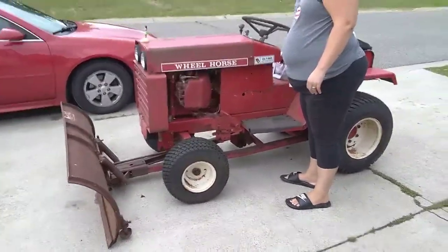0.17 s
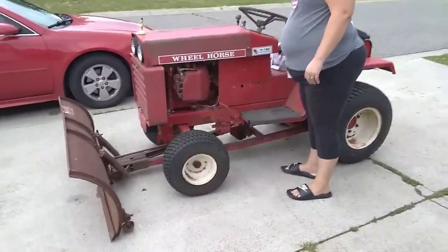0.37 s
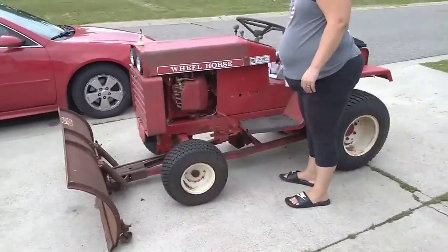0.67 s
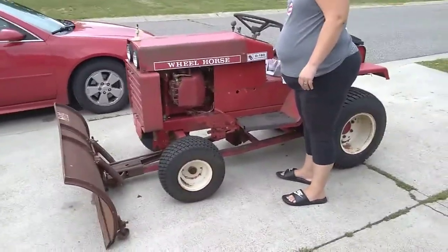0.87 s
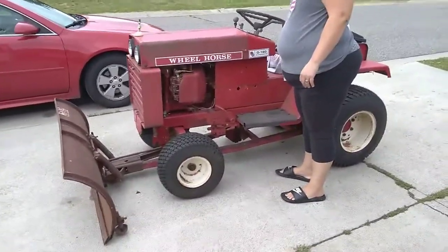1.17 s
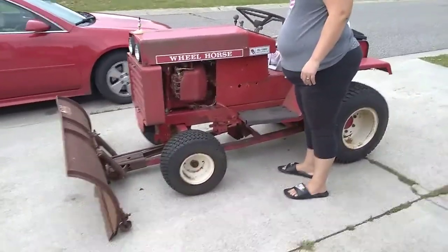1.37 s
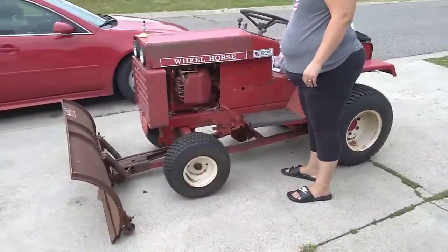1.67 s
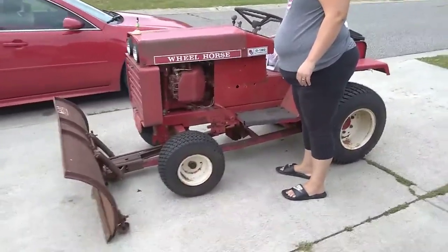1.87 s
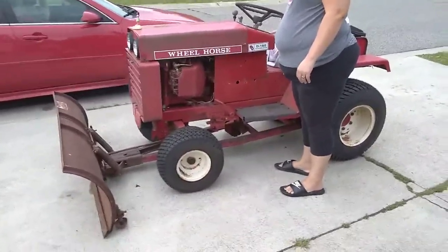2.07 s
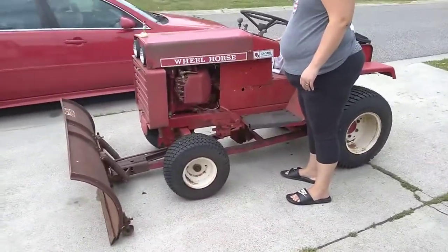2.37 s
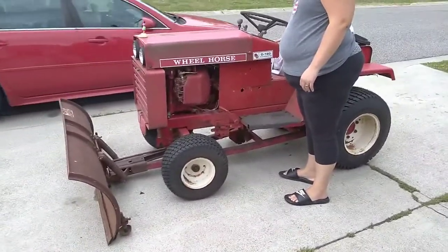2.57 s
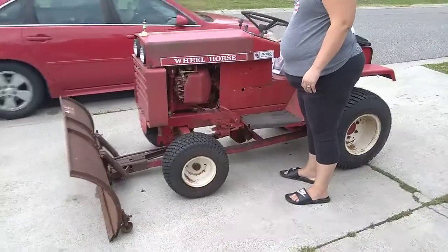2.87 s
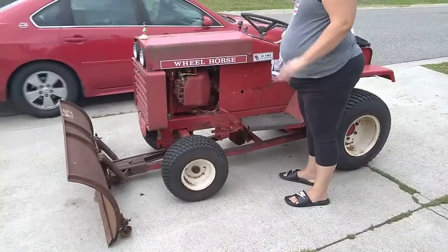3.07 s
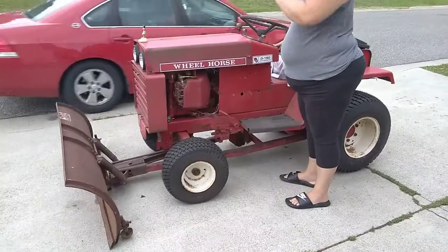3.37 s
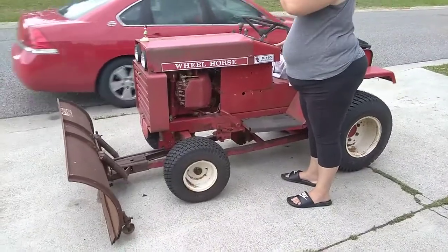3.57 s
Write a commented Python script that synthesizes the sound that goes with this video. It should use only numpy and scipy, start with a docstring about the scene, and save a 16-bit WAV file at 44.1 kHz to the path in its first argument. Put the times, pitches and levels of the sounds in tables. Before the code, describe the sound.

A garden tractor idles outdoors with an uneven putter, fan roar and metallic clacks.

```python
"""A small four-stroke garden tractor engine idles outdoors, close to a stereo microphone.
From the start the exhaust putters in an uneven pattern that repeats every two turns, the flywheel fan
roars and whines in its metal cover, and the valves tick once a turn. Loose panels ring, then fade as the
engine picks up. From 0.2 to 2.5 s the valves give a dozen sharper clacks. Near 2.4 s the governor (the
speed control) lets the speed sag, so the panels ring again; after 3.3 s the speed begins to recover."""
import sys
import numpy as np
from scipy.fft import rfft, irfft, next_fast_len
from scipy.io import wavfile
from scipy.ndimage import map_coordinates

SR = 44100
rng = np.random.default_rng(int(sys.argv[2]) if len(sys.argv) > 2 else 0)


def inscribe(sig):
    """Save sig as 16-bit PCM at rate SR to the path in sys.argv[1].

    A 1-D sig is mono; a 2-D sig holds one channel per row.
    Samples are clipped to [-1, 1] before scaling.
    """
    pcm = np.round(np.clip(np.atleast_2d(sig).T, -1, 1) * 32767)
    wavfile.write(sys.argv[1], SR, pcm.astype(np.int16))


N = 164052

# how fast the engine turns: time_s, turns_per_s
ENGINE_SPEED = [(0.0, 39.14), (0.33, 41.5), (0.55, 41.77), (0.68, 41.57), (0.96, 41.16), (1.3, 41.63),
                (1.85, 41.87), (2.2, 41.74), (2.38, 41.29), (2.7, 39.2), (2.95, 38.01), (3.13, 37.3),
                (3.3, 37.38), (3.58, 38.42), (3.72, 38.85)]
# loudness before each layer's own trim: time_s, exhaust_db, low_roar_db, high_roar_db, hiss_db
LOUDNESS = [(0.0, -27.5, -30, -36, -41), (0.14, -27, -29, -34.5, -38.5), (0.32, -26.5, -30, -37, -38),
            (0.38, -29.5, -34.5, -40.5, -42.5), (0.6, -27.5, -32.5, -39, -40.5),
            (1.02, -26.5, -31, -40.5, -41), (1.25, -25, -29.5, -38, -38),
            (1.48, -27.5, -33.5, -39.5, -42.5), (1.66, -25, -30.5, -37.5, -40),
            (1.82, -27.5, -33, -41, -43.5), (1.96, -26, -30.5, -37.5, -39), (2.14, -27, -32, -39, -40),
            (2.23, -30, -36, -41.5, -43), (2.72, -26.5, -29.5, -37.5, -41),
            (2.87, -28.5, -34.5, -38.5, -39.5), (3.0, -26.5, -33, -39.5, -40.5),
            (3.5, -26, -28.5, -35.5, -38.5), (3.72, -27, -29.5, -35, -38.5)]
# exhaust pulses in one cycle (two turns), the firing first: share_of_cycle, strength_db
PULSES = [(.135, 2), (.34, -2), (0.609, 1), (0.826, -1.5)]
# exhaust tones at fast and at slow idle: multiple_of_speed, level_db
FAST_TONES = [(2, -4), (2.5, -13), (3, -5), (3.5, -9), (4, 1.2), (4.5, -5.5), (5, -2), (6, -15), (6.5, -16),
              (7, -18.5), (7.5, -18.5), (8, -7)]
SLOW_TONES = [(2, -3), (2.5, -9), (3, 2), (3.5, -5), (4, -2), (4.5, -1), (5, 2), (5.5, -18), (6, -6),
              (6.5, -14.5), (7, -12.5), (7.5, -3), (8, -7), (8.5, -13), (9, -8)]
# tone colour of the gas puffs, the fan roar and the valve hiss: pitch_hz, level_db
PUFF_COLOUR = [(50, -7), (75, -6.5), (170, -5.5), (330, -9), (420, -9), (700, -40)]
ROAR_COLOUR = [(430, -4), (620, -3.5), (730, -1.5), (810, -3.5), (950, -4.5), (1150, -2.5), (1300, -7.5),
               (1490, -5.5), (1700, -7.5), (2100, -9.5), (2750, -10), (3200, -11), (3600, -15.5),
               (4200, -15.5), (5000, -19)]
HISS_COLOUR = [(5000, -10.5), (5650, -8.5), (5770, -3), (5900, -7.4), (6550, -3.1), (6700, -5.0),
               (6880, 0.0), (7600, -5.9), (8400, -5.2), (10700, -8.6), (12000, -14.7), (12900, -12.3),
               (13350, -2.7), (13750, -12.7), (14200, -12.4)]
# fan tones and where the cover rings with them: multiple_of_speed, ring_hz, width_hz, level_db
FAN_TONES = [(18, 745, 45, -44), (18, 672, 62, -43), (24, 897, 34, -35.5), (36, 1405, 69, -39),
             (36, 1488, 39, -44)]
# notes of the loose panels: pitch_hz, width_hz, calm_db, shaken_db
PANEL_NOTES = [(899.3, 43, -47.5, -43.5), (1014, 34, -52, -45.5), (1562, 60, -62, -47),
               (2823, 98, -59, -45.5)]
# sharp valve clacks: start_s, strength_db
VALVE_CLACKS = [(0.1944, -23), (0.5046, -18.5), (0.528, -21), (0.6733, -20), (0.987, -18.5),
                (1.2306, -21.5), (1.373, -20.5), (1.422, -19.5), (1.685, -22), (1.732, -19), (2.187, -21),
                (2.543, -27)]
# stereo width by pitch, alternating between centred and wide bands: pitch_hz, side_over_middle_db
STEREO_WIDTH = [(60, -8), (330, -6), (550, -17), (800, -17), (1100, -50), (1400, -8.5), (1750, 0.5),
                (2020, 10), (2150, 51), (2290, 4.5), (2700, -1.5), (3200, -7), (3550, -14), (3850, 17.5),
                (4100, 59), (4400, -1.5), (4650, 3.5), (5250, -21), (5850, -1.5), (6350, 10.5), (6900, 0.5),
                (7500, -4), (8400, 3.5), (9800, -0.5), (13200, -3.5)]
# which side is louder: pitch_hz, left_over_right_db
STEREO_BALANCE = [(60, -3), (120, -2), (240, 2), (470, 3.0), (930, 0), (1860, 1.5), (3690, 2), (7320, 1.5),
                  (14600, 2)]

TICK_AT = 0.71  # share of a turn at which the valves tick
TOP_HZ = 14350  # highest pitch heard


def amp(db):
    """Turn decibels into a gain."""
    return 10 ** (np.asarray(db) / 20)


def unit(x):
    """Scale to an average (rms) level of 1."""
    return x / np.sqrt(np.mean(x ** 2) + 1e-20)


def along(table, hz):
    """Look up a table's value at any pitch."""
    pitches, values = np.transpose(table)
    return np.interp(np.log(hz + 1), np.log(pitches + 1), values)


def curves(table):
    """One value per sample for each column after the time."""
    times, *columns = np.transpose(table)
    return [np.interp(np.arange(N) / SR, times, column) for column in columns]


def wobble(rate):
    """A smooth curve through rate random points a second."""
    return map_coordinates(rng.standard_normal(int(N * rate / SR) + 4), [np.arange(N) * rate / SR])


def filtered(x, response):
    """Give each pitch in x the gain response(hz)."""
    size = next_fast_len(N + SR // 2)
    return irfft(rfft(x, size) * response(np.fft.rfftfreq(size, 1 / SR)), size)[..., :N]


def above(hz, edge_hz, order=8):
    """A gain that keeps pitches above the edge."""
    return 1 / np.sqrt(1 + (edge_hz / (hz + 1)) ** (2 * order))


def below(hz, edge_hz, order=8):
    """A gain that keeps pitches below the edge."""
    return 1 / np.sqrt(1 + (hz / edge_hz) ** (2 * order))


def noise():
    """Two unrelated white noises."""
    return rng.standard_normal((2, N))


def stereo(pair, shared=0.65):
    """Make left and right from two noises; the side is partly the middle, a quarter wave off."""
    side = np.sqrt(shared) * filtered(pair[0], lambda hz: 1j) + np.sqrt(1 - shared) * pair[1]
    angle = lambda hz: np.arctan(amp(along(STEREO_WIDTH, hz)))
    middle = filtered(pair[0], lambda hz: np.cos(angle(hz)))
    side = filtered(side, lambda hz: np.sin(angle(hz)))
    return np.array([middle + side, middle - side])


def chug(tones, cycles, firing_db, size=512):
    """The repeating exhaust wave: the table sets each tone's level, the pulses set its timing."""
    multiples, db = np.transpose(tones)
    pulses = sum(amp(level + firing_db * (i == 0)) * np.exp(-4j * np.pi * multiples * at)
                 for i, (at, level) in enumerate(PULSES))
    place = np.arange(size) / size
    wave = amp(db) @ np.cos(4 * np.pi * multiples[:, None] * place + np.angle(pulses)[:, None])
    return -unit(np.interp(cycles % 1, place, wave, period=1))


def muffler(hz, boom_hz=323.5, width_hz=27, boom_db=3):
    """The muffler can booms at one pitch and loses the deepest bass."""
    return amp(boom_db / (1 + (2 * (hz - boom_hz) / width_hz) ** 2)) * above(hz, 64, order=5)


def exhaust(speed, turns, level_db, fast_hz=41.4, slow_hz=39.54, puff_db=-15):
    """Slightly uneven chugs with a puff of gas at each firing; the tone changes as the engine slows."""
    cycles = turns / 2 + 0.0028 * wobble(24.72)
    slowness = np.clip((fast_hz - speed) / (fast_hz - slow_hz), 0, 1)
    fast = chug(FAST_TONES, cycles, firing_db=0.5)
    slow = chug(SLOW_TONES, cycles, firing_db=4.8)
    tone = ((1 - slowness) * fast + slowness * slow) * amp(0.4 * wobble(40))
    tone = filtered(tone, muffler)
    side = filtered(tone, lambda hz: 1j * np.hypot(1, 170 / (hz + 20)))  # wider in the bass
    side *= amp(-11 + 0.49 * wobble(19))
    since_firing = (cycles - PULSES[0][0]) % 1
    gas = noise() * np.exp(-since_firing)
    gas = filtered(gas, lambda hz: amp(along(PUFF_COLOUR, hz)) * muffler(hz) * below(hz, 380))
    puff = unit(stereo(gas, shared=0.14))
    return amp(level_db) * (unit(np.array([tone + side, tone - side])) + amp(puff_db) * puff)


def fan_roar(turns, low_db, high_db, repeat_share=0.29, split_hz=1643, size=2048):
    """Rushing fan air, plus casing clatter that repeats every cycle; both throb with the engine."""
    place = (turns / 2 + 0.00051 * wobble(15)) % 1 * size
    patterns = rng.standard_normal((2, size))
    clatter = np.array([unit(map_coordinates(row, [place], mode="wrap")) for row in patterns])
    air = np.sqrt(repeat_share) * clatter + np.sqrt(1 - repeat_share) * noise()
    throb_db = -0.16 * np.cos(2 * np.pi * (turns - TICK_AT))
    air = stereo(air * amp(throb_db + 1.22 * wobble(220)))
    surge = amp(1.5 * np.cos(2 * np.pi * (turns / 2 - 0.86)))  # swells ahead of each firing
    colour = lambda hz: amp(along(ROAR_COLOUR, hz))
    low = filtered(air * surge, lambda hz: colour(hz) * above(hz, 419) * below(hz, split_hz))
    high = filtered(air, lambda hz: colour(hz) * above(hz, split_hz) * below(hz, 5230))
    return amp(low_db - 2.5) * unit(low) + amp(high_db) * unit(high)


def fan_whine(speed, turns, waver_db=2.1, throb=0.35):
    """Fan tones swell as they near a pitch at which the cover rings, and throb once a turn."""
    out = np.zeros(N)
    drift = 0.2 * wobble(23.93)
    for multiple, ring_hz, width_hz, db in FAN_TONES:
        off_pitch = 2 * (multiple * speed - ring_hz) / width_hz
        gain = amp(db + waver_db * wobble(20)) / (1 + off_pitch ** 2)
        out += np.sqrt(2) * gain * np.sin(2 * np.pi * multiple * turns + drift)
    return out * (1 + throb * np.cos(2 * np.pi * (turns - TICK_AT)))


def loose_panels(speed, turns, shake_below_hz=39.75, knock_db=5):
    """Sheet metal, knocked once a turn, rings louder when the engine is slow enough to shake it."""
    shaken = (1 + np.tanh((shake_below_hz - speed) / 0.26)) / 2
    knocks = amp(knock_db * np.cos(2 * np.pi * turns))
    out = np.zeros((2, N))
    for pitch_hz, width_hz, calm_db, shaken_db in PANEL_NOTES:
        ring = filtered(noise() * knocks, lambda hz: 1 / (1 + 2j * (hz - pitch_hz) / width_hz) ** 2)
        out += amp(calm_db + (shaken_db - calm_db) * shaken) * unit(stereo(ring))
    return out


def air_rumble(level_db=-58.5):
    """Moving air rumbles faintly on each microphone opening."""
    rumble = filtered(noise(), lambda hz: above(hz, 20, order=2) * below(hz, 45, order=2))
    return amp(level_db) * unit(rumble)


def valves(turns, hiss_db, tick_db=-6.5, scatter_db=4.5, tick_width_turns=0.16):
    """The valves make a metallic hiss, a tick of random strength each turn, and the louder clacks."""
    nearest = np.round(turns - TICK_AT).astype(int)
    strengths = amp(tick_db + scatter_db * np.clip(rng.standard_normal(nearest[-1] + 2), -2, 1.5))
    ticks = strengths[nearest] / np.cosh((turns - TICK_AT - nearest) / tick_width_turns)
    flicker = amp(0.58 * wobble(500))
    ticking = amp(hiss_db + 1.33) * unit(np.hypot(0.5, ticks) * flicker)  # 0.5 is the steady hiss
    clacks = sum(amp(db - 0.5) * clack(start_s) for start_s, db in VALVE_CLACKS)
    raw = noise() * np.hypot(ticking, clacks)
    hiss = filtered(raw, lambda hz: amp(along(HISS_COLOUR, hz)) * above(hz, 4910) * (hz < TOP_HZ))
    return raw.std() * unit(stereo(hiss, shared=0.2))


def clack(start_s, rise_s=0.0044, decay_s=0.005):
    """The loudness of one valve clack: a quick swell that dies away."""
    age = np.maximum(np.arange(N) / SR - start_s, 0)
    return (1 - np.exp(-(age / rise_s) ** 2)) * np.exp(-age / decay_s)


def scene():
    """Add up the sounds; one count of turns keeps all the engine's parts in step."""
    speed, = curves(ENGINE_SPEED)
    turns = np.cumsum(speed) / SR
    exhaust_db, low_db, high_db, hiss_db = curves(LOUDNESS)
    casing = fan_roar(turns, low_db, high_db) + fan_whine(speed, turns) + loose_panels(speed, turns)
    return exhaust(speed, turns, exhaust_db) + casing + valves(turns, hiss_db) + air_rumble()


def record(dry):
    """The microphone hears left and right a little differently, and nothing above TOP_HZ."""
    halves = np.array([[0.5], [-0.5]])
    return filtered(dry, lambda hz: amp(along(STEREO_BALANCE, hz) * halves) * (hz < TOP_HZ))


dry = scene()
out = record(dry)
inscribe(out)
```